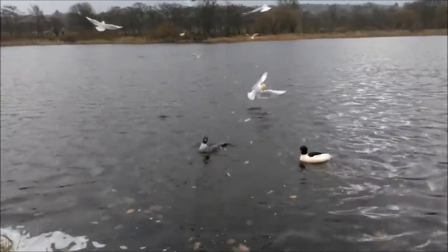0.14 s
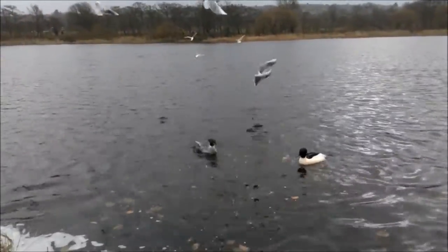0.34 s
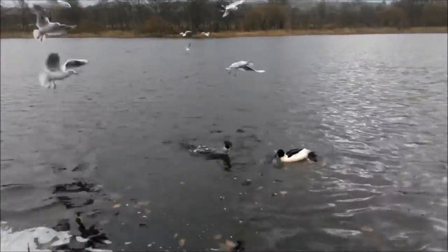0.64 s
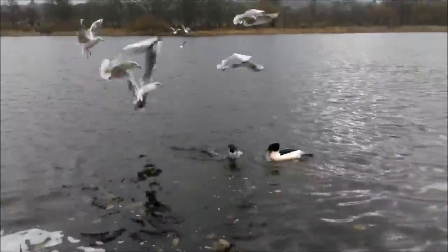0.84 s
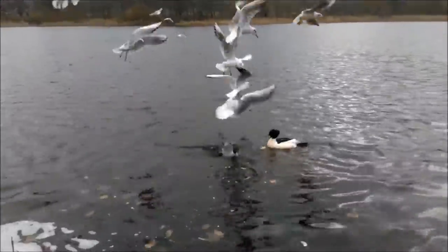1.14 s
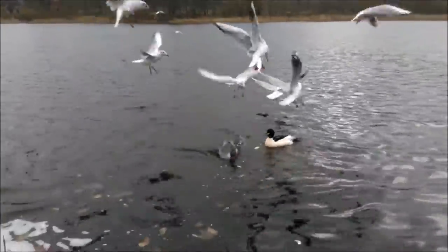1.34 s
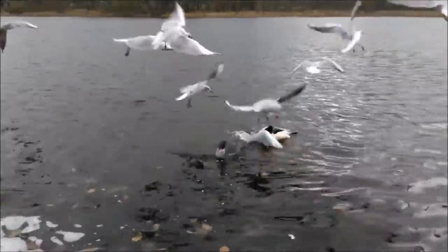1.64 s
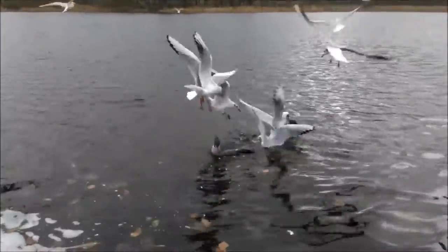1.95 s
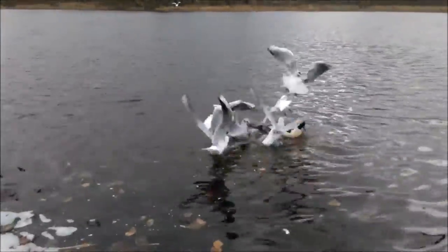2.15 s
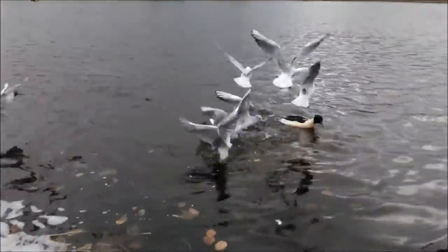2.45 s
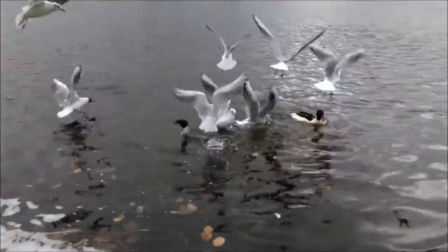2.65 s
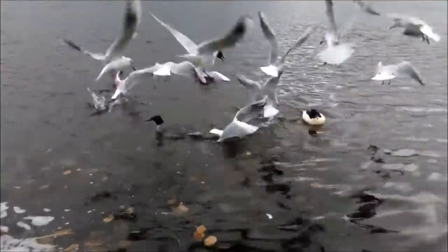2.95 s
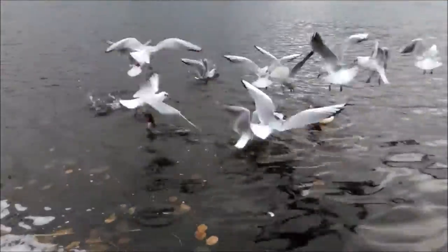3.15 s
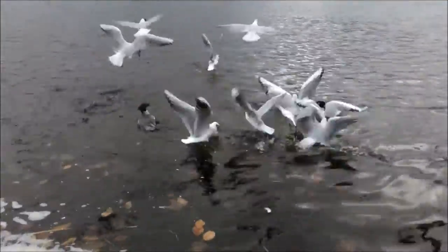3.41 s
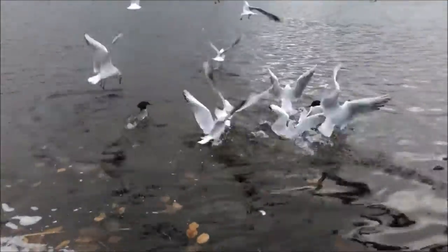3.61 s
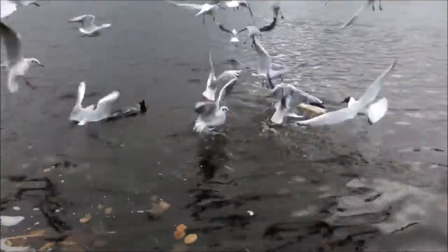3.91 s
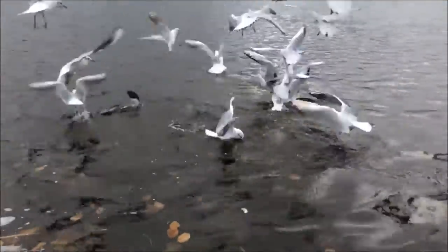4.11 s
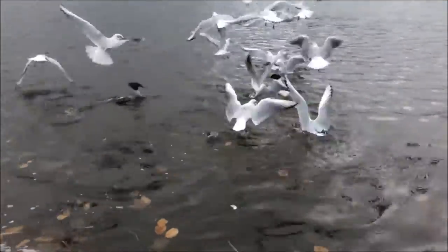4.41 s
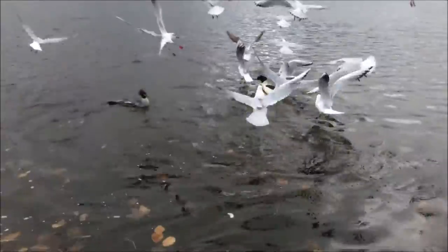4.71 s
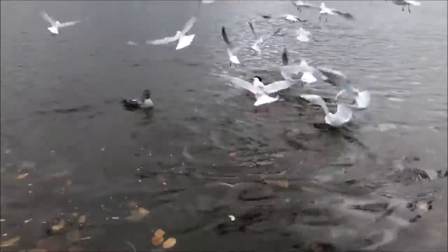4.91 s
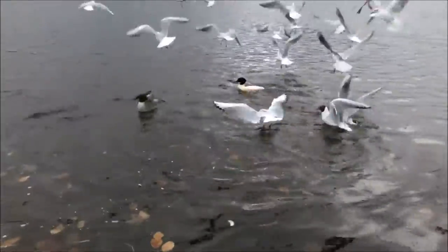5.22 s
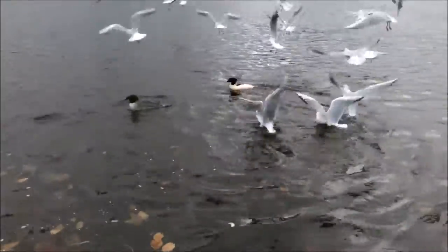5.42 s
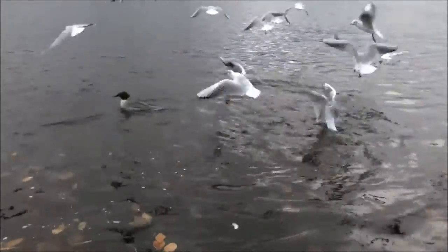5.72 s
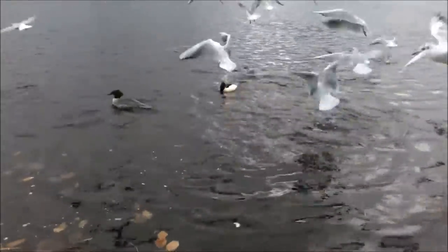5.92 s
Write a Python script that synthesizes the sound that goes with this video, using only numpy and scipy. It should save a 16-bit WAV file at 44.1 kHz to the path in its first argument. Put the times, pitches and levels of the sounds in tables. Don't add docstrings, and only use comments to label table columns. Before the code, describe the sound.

Close open-air stereo beside water, with faint distant traffic hum and hiss. In the first half second there is only soft low wind, then a cluster of small crackling splashes. From 0.7 s gulls give short, harsh, nasal cries, each a rapid rasping throb, some shrill, others dull or hoarse, with little gaps. A small wind bump comes at 1.4 s among light slaps. Around 2.0 to 2.8 s splashes sharpen, with faint bubble plops. At 3.0 s the loudest piercing shriek bursts out, doubled by a duller call. Wind then buffets the microphone in deep, uneven thumps, heaviest at 3.4 to 3.7 s, while wet slaps and fizzing spray peak. From 3.9 to 4.7 s hoarse calls crowd together, with another strong splash at 4.4 s. Afterwards shorter, weaker cries, fewer splashes and scattered gusts fade towards 6 s.

```python
import sys
import numpy as np
from scipy import signal
from scipy.fft import rfft, irfft, next_fast_len
from scipy.io import wavfile
from scipy.ndimage import uniform_filter1d

SR = 44100
rng = np.random.default_rng(int(sys.argv[2]) if len(sys.argv) > 2 else 0)


def waveform_to_disk(signal):
    frames = np.transpose(np.atleast_2d(signal))
    scaled = np.clip(frames, -1, 1) * 32767
    samples = np.round(scaled).astype(np.int16)
    wavfile.write(sys.argv[1], SR, samples)


def how_loud(loudness_db):
    steps = np.asarray(loudness_db, float) / 20
    return 10 ** steps


N = 267378
T = np.arange(N) / SR

# (loudest at [s], rise [s], fall [s], peak level [dB], pitch [Hz])
SHRILL = [
    (0.899, 0.029, 0.053, -29.5, 903),
    (1.095, 0.047, 0.022, -27.5, 1086),
    (1.848, 0.024, 0.016, -27, 1060),
    (2.984, 0.035, 0.038, -15.5, 1080),
    (3.167, 0.055, 0.022, -19.5, 1053),
    (3.229, 0.021, 0.075, -28.5, 901),
    (5.367, 0.004, 0.004, -38.5, 672),
]
PLAIN = [(0.682, 0.018, 0.013, -37.5, 833), (0.789, .004, 0.0059, -57.5, 696),
         (0.967, .004, 0.015, -32.5, 904), (1.253, 0.019, 0.032, -32, 766),
         (1.717, 0.01, 0.0071, -40.5, 750), (1.932, .016, 0.004, -43.5, 1002),
         (3.386, 0.026, 0.03, -25, 1032), (3.633, 0.015, 0.026, -26, 819), (4.57, 0.032, 0.0185, -28, 868),
         (4.934, 0.013, .004, -42, 744), (5.527, 0.0094, 0.013, -31, 868), (5.717, 0.02, 0.012, -31.5, 816),
         (6.056, 0.0045, .004, -50.5, 810)]
HOARSE = [(2.616, 0.019, 0.025, -39, 731), (2.81, 0.065, 0.018, -37.5, 1079),
          (2.882, 0.017, 0.012, -31.5, 950), (4.054, 0.025, 0.012, -37.5, 1000),
          (4.132, 0.013, 0.033, -25, 1033), (4.2, 0.03, 0.024, -24, 851), (4.25, 0.01, 0.013, -29.5, 980),
          (4.387, 0.057, 0.034, -29, 809.5), (4.835, 0.0088, 0.015, -40, 892),
          (4.996, .025, 0.052, -32, 907), (5.631, 0.024, 0.037, -52, 867), (5.755, 0.017, 0.026, -42, 822),
          (4.502, 0.017, 0.018, -42, 786), (4.70, .014, 0.015, -47, 900)]
DULL = [
    (1.154, 0.004, .026, -36, 961),
    (1.506, 0.016, 0.004, -37.5, 1025),
    (2.984, 0.036, 0.048, -22.5, 913),
    (3.469, .014, .016, -35.5, 936),
    (4.632, 0.02, 0.04, -26.5, 888),
    (5.164, .015, 0.012, -32.5, 811),
    (1.525, .004, .004, -37.5, 851),
    (3.668, .016, .02, -33.5, 903),
    (4.319, .014, .016, -38.5, 876),
]
FALLING = [
    (2.036, 0.018, 0.05, -30.5, 871),
    (2.402, 0.03, 0.03, -32, 1027),
    (3.917, .031, 0.06, -26, 1049),
    (5.556, .004, 0.048, -50, 956),
]
# (beak resonance [Hz], beak band level [dB], delay at right port [ms])
SHRILL_BEAKS = [(2900, 8, 0.35), (3200, 10.5, 0.25), (3320, 9, 0.21), (3240, 13, .1), (3360, 16.5, .04),
                (3300, 14, .06), (3430, 8.5, .05)]
PLAIN_BEAKS = [(2530, 0, 0.34), (1300, 14, 0.026), (3700, 5.5, 0.13), (3350, 2, .15), (3270, -12, 0.27),
               (3540, -1.5, 0.2), (3020, 2.5, .01), (2710, 2.5, 0.24), (2800, -1, 0.29), (3900, 4, 0.064),
               (2570, 5, 0.11), (2800, 2.5, -0.087), (2980, -13, 0.2)]
HOARSE_BEAKS = [(3740, -7, 0.22), (2480, -8, 0.19), (3560, 1, 0.12), (3080, 5, 0.11), (3470, 4.5, 0.18),
                (3220, 8.5, 0.22), (3650, 4, 0.12), (3300, 11, 0.06), (3000, -6, 0.19), (3140, 5, -0.15),
                (4020, 8, 0.097), (3030, 3, -0.0051), (3440, 13, 0.16), (3000, -5, -0.012)]
DULL_BEAKS = [(3960, 3, -0.17), (3700, 0, 0.19), (3500, 3, 0.13), (3660, -1, -0.048), (2800, -4, -0.016),
              (2620, -4, -0.091), (3640, 8, 0.037), (2980, -8, 0.14), (3000, -5, 0.17)]
FALLING_BEAKS = [(2720, 4, .1), (3300, 6.5, 0.12), (3140, 3.2, .07), (3000, -5, .04)]
# (pitch drop at start [share], at end [share], first throb [dB], last throb [dB])
SHRILL_BENDS = [(0.056, -0.0038, -10, -7.5), (.12, -.05, -15.5, -10), (0.06, 0.031, -8, -7.5),
                (.13, -0.0066, -17, -14), (0.18, 0.11, -24, -16), (0.0098, -0.016, 1.5, -13),
                (.01, .01, -3, -3)]
PLAIN_BENDS = [(0.11, .15, -7.5, -6.5), (.01, .01, -3, -3), (.01, 0.015, -3, -14),
               (-.05, -0.019, -5.5, -5.5), (.03, .03, -4, -6), (0.15, .01, 0, -3), (.15, .14, -7.5, -7),
               (.03, 0.033, -3, -6), (.13, .1, -6, -6), (-0.074, .03, -5, -3), (.03, .07, -4, -10),
               (.05, -0.034, -8.5, -7.5), (.01, .01, -3, -3)]
HOARSE_BENDS = [(.06, .07, -0.5, -1.5), (.22, 0.13, -6.5, -5), (0.025, .17, -1.5, -8),
                (0.14, 0.039, -4, -1.5), (0.11, .25, -9, -4), (-.08, 0.0986, -6, -2), (.05, 0.081, -7, -11),
                (-0.058, 0.0185, -9, -13.5), (0.12, .08, -2, -4.5), (0.12, 0.079, -10, -7),
                (.05, .08, -5, -1), (0.031, .08, 0, -6.5), (.08, 0.008, -10, 1), (.05, 0.066, 1, -10)]
DULL_BENDS = [(0.021, 0.13, -5, -8.5), (-0.018, .01, -3.5, -3), (0.065, 0.053, -17.5, -14),
              (0.015, 0.067, -3, -1.5), (.03, .05, -4, -9), (.06, 0.032, -10, -9), (.01, .01, -3, -3),
              (-0.014, 0.059, -6, -10.5), (.03, 0.014, -4.5, -3)]
FALLING_BENDS = [(-0.07, .2, -2, -25), (0.2, 0.13, -8.5, -11), (.05, 0.25, -8, -12), (.01, 0.09, -3, -5)]
# (level [dB], ...)
PIPES_DB = [
    (-4.5, -3, 1.5, 0, 6, 1, -13),
    (2, 4, -1.5, 4.5, -2.5, 2.5, 6.5, -4.5, -2.5, 3, 5, 3, -3),
    (6, 2, 0.5, -3.5, 5.5, 4.5, 5, 4.5, 5, 3, 5, 0.5, 3, 1),
    (6, 3, 7, 3.5, 6.4, 5.4, 1.5, 4.2, 3.2),
    (2.1, 4.8, 3.4, 4.5),
]
# (top band level [dB], climb of the beak band during the call [share])
VOICES = [
    (-1.5, 0.055),
    (-8.5, 0.013),
    (-7, 0.072),
    (-7.5, 0.019),
    (-7, -0.11),
]
ROUGHNESS = [
    .5,
    .48,
    .68,
    .46,
    .54,
]
# (centre [Hz], width [Hz], level [dB])
THROAT = [(4820, 4600, -0.5), (7700, 6300, -19.5), (8930, 4200, -9.5), (12700, 1400, -30)]
# (time [s], level [dB])
SPRAY = [(0.0, -101), (0.39, -70.5), (0.58, -60.5), (0.93, -67), (1.08, -59), (1.25, -61), (1.52, -69.5),
         (1.87, -62), (2.33, -55), (2.82, -51.5), (3.37, -47.5), (4.05, -49.5), (4.15, -44), (4.32, -58),
         (5.01, -54.5), (5.32, -61), (5.72, -60), (6.0, -69)]
# (frequency [Hz], level per Hz [dB])
SPRAY_COLOUR = [(300, -1), (550, 5), (1100, -3.5), (2500, 2.5), (6500, -3.5), (9400, -1), (12500, -3),
                (16000, -18)]
# (time [s], peak level [dB],
# low body level [dB])
SLAPS = [(0.448, -26.5, -49), (0.48, -31, -19), (0.51, -34, -16), (0.5643, -24, -31), (0.606, -29.5, 17),
         (1.487, -26, -27), (1.4153, -36, -34), (1.687, -31, -17), (2.1062, -25, -17), (2.173, -30, -25),
         (2.266, -36, -28), (2.311, -25.5, 0), (2.4947, -27, -4), (2.5242, -16, -16), (2.7, -35, 2),
         (2.7528, -23, -23), (3.263, -17, -25), (3.3058, -14, -4), (1.503, -29, -26), (3.477, -20, -6),
         (3.5168, -18, -28), (3.5495, -15, -12), (3.756, -19.5, -20), (3.8834, -17, 11),
         (4.3803, -14.5, -11), (4.816, -21.5, -10), (5.362, -29, -36), (5.8634, -38, -20),
         (1.786, -31.5, -18), (1.891, -28, -5), (1.951, -32, -5), (2.298, -27.5, -16), (2.3422, -25, -12),
         (2.505, -18, -17), (2.7185, -26, -24), (2.7808, -20.5, 0), (3.5983, -21, -5), (3.6198, -12.5, 8),
         (4.264, -26, -12), (4.332, -23, 4), (5.195, -35, 15), (5.783, -40, 15), (1.696, -27, -3),
         (1.523, -26.5, -23), (1.716, -30, -12), (2.642, -31, -5)]
# (time [s], peak level [dB], pitch [Hz])
PLOPS = [
    (2.255, -50, 440),
    (2.311, -42, 420),
    (2.478, -47, 754),
    (2.5, -47, 627),
    (2.64, -43.5, 594),
    (5.782, -48, 603),
]
# (frequency [Hz], level [dB])
SHADE = [(1000, 0.5), (1900, 0.4), (2700, -13), (4200, -3), (6000, -4.5), (9000, -0.1), (12500, -6),
         (16000, -14)]
# (strongest at [s], length [s], left port level [dB], right port level [dB])
GUSTS = [(0.017, 0.13, -68, -50.5), (0.222, 0.25, -49, -54.5), (0.51, 0.24, -49, -49),
         (0.819, 0.042, -45, -56), (1.374, 0.021, -33.5, -56), (1.46, 0.049, -67, -44.5),
         (2.495, 0.29, -73, -55), (2.942, 0.13, -38.5, -34.5), (3.102, 0.18, -32, -29),
         (3.186, 0.29, -42, -39.5), (3.361, 0.07, -29, -25), (3.47, 0.15, -29, -26.5),
         (3.592, 0.11, -25.5, -30.5), (3.701, 0.098, -28.5, -28), (3.9, 0.36, -51.5, -45),
         (4.114, 0.065, -29, -33), (4.226, 0.11, -55, -33.5), (4.288, 0.37, -44.5, -41),
         (4.569, 0.061, -32, -34.5), (4.683, 0.061, -34, -45), (4.874, 0.054, -27, -36),
         (4.957, 0.23, -37, -30.5), (5.088, 0.17, -38, -49), (5.402, 0.13, -44.5, -33.5),
         (5.562, 0.24, -45.5, -37.5), (5.648, 0.049, -49, -27.5), (5.755, 0.21, -53.5, -43.5),
         (5.947, 0.097, -51, -39)]
# (centre [Hz], width [Hz], pops [1/s], level [dB], extra level per gust level [dB/dB])
EDDIES = [
    (62.4, 60, 140, -2, -0.32),
    (109.5, 100.5, 200, 1, 0),
    (212.4, 204, 250, -7.5, 0.53),
    (440, 263, 580, -28, 3),
]
# (time [s], peak level [dB], pitch [Hz], port [0 left to 1 right])
THUMPS = [(1.372, -22, 148, 0.31), (2.926, -17, 176, 0), (3.042, -23, 256, 1), (3.056, -12.5, 201, 0),
          (3.4, -15.5, 177, 0), (3.426, -11.5, 188, 1), (3.482, -10, 252, 1), (3.566, -9, 190, 1),
          (3.61, -0.5, 274, 0), (3.707, -15, 220, 0), (3.707, -15.5, 205, 1), (3.729, -15, 186, 0),
          (4.116, -17, 232, 1), (4.123, -21, 181, 0.32), (4.187, -25, 149, 0.87), (4.553, -15, 158, 0),
          (4.65, -26, 170, 1), (4.749, -29, 187, 1), (4.797, -24, 233, 0), (4.777, -34, 258, 1),
          (5.56, -26.5, 295, 1), (4.853, -16.5, 203, 0), (4.872, -22, 275, 1), (4.958, -16.5, 250, 1),
          (5.011, -31, 158, 0), (5.386, -17.5, 248, 1), (5.446, -17, 142, 1), (5.92, -31, 140, 0.13),
          (4.851, -26, 520, 0), (3.607, -19, 620, 0), (3.574, -26, 715, 1), (5.641, -30, 480, 1),
          (5.385, -34, 520, 1)]
# (frequency [Hz], level per Hz [dB])
ROAD_COLOUR = [(200, -2.5), (450, -11.5), (900, -6), (1150, -12.5), (1400, -16), (2500, -25), (9500, -27.5),
               (16000, -32)]

THROB_S, THROB_SLIP_S, THROB_SCATTER_DB = 0.0135, 0.001, 1.2
PITCH_WOBBLE = 0.012
PIPE_HZ, PIPE_PER_PITCH = 1725, 0.57
GLINT_STEP_HZ, GLINT_RAD, GLINT_FROM_HZ = 250, 2.2, 1900
PLOP_T60_S, PLOP_GLIDE = 0.067, 2.1
CALM_DB, GUST_RISE, GUST_FALL = -63.5, 0.88, 0.97
ROAD_DB = -58.5
TOP_HZ = 15600


def gulls():
    kinds = zip(
        (SHRILL, PLAIN, HOARSE, DULL, FALLING),
        (SHRILL_BEAKS, PLAIN_BEAKS, HOARSE_BEAKS, DULL_BEAKS, FALLING_BEAKS),
        (SHRILL_BENDS, PLAIN_BENDS, HOARSE_BENDS, DULL_BENDS, FALLING_BENDS),
        PIPES_DB, VOICES, ROUGHNESS)
    out = np.zeros((2, N))
    for calls, beaks, bends, pipes, (top_db, climb), rough in kinds:
        for row, (beak_hz, beak_db, lag_ms), bend, pipe_db in zip(calls, beaks, bends, pipes):
            beats = throbs(*row, *bend)
            pipe_hz = PIPE_HZ + PIPE_PER_PITCH * (beats[:, 2].mean() - 850)
            s, voice = call(beats, pipe_hz, pipe_db, beak_hz, beak_db, top_db, climb, rough)
            add(out, glint(voice), s, 0.8, lag_ms)
    t = T[:8000]
    scatter = rng.standard_normal((2, len(t))) * how_loud(-60 * t / 0.1) * (t > 0.002)
    return out + how_loud(-33) * signal.fftconvolve(out, scatter, axes=1)[:, :N]


def throbs(peak_s, rise_s, fall_s, db, hz, sag_start, sag_end, first_db, last_db):
    slip, scatter, wobble = rng.standard_normal((16, 3)).T
    before, after = (int(min(round(x / THROB_S), 7)) for x in (rise_s, fall_s))
    place = np.r_[np.arange(-before, 0) / max(before, 1), np.arange(after + 1) / max(after, 1)]
    early, n = place < 0, len(place)
    s = peak_s + place * np.where(early, rise_s, fall_s)
    s = s + THROB_SLIP_S * np.clip(slip[:n], -2, 2) * (place != 0)
    size_db = db + place ** 2 * np.where(early, first_db, last_db) + THROB_SCATTER_DB * scatter[:n]
    sag = abs(place) ** 1.5 * np.where(early, sag_start, sag_end)
    pitch = hz * (1 - sag + PITCH_WOBBLE * wobble[:n])
    return np.c_[s, size_db, pitch]


def call(beats, pipe_hz, pipe_db, beak_hz, beak_db, top_db, climb, rough):
    s, db, hz = np.transpose(beats)
    t = s[0] + np.arange(-2048, 7168) / SR
    middle = (s[1:] + s[:-1]) / 2
    dip_db = np.minimum(db[1:], db[:-1]) - 22 * (1 - rough)
    knots = np.r_[s[0] - 0.017, s[0] - 0.008, s, middle, s[-1] + 0.008, s[-1] + 0.017]
    effort_db = np.r_[db[0] - 40, db[0] - 11, db, dip_db, db[-1] - 11, db[-1] - 40]
    order = np.argsort(knots)
    swell = uniform_filter1d(np.interp(t, knots[order], how_loud(effort_db[order])), size=120)
    swell[(t < knots.min()) | (t > knots.max())] = 0
    throb = np.searchsorted(middle, t)
    slide = 1 + 1.8 * np.clip(t - s[throb], -0.015, 0.015)
    pitch = uniform_filter1d(hz[throb] * slide, size=100)
    phase = 2 * np.pi * np.cumsum(pitch * (1 + 0.07 * rough * walk(250, size=len(t)))) / SR
    pulses = sum(np.cos(k * phase) for k in range(1, 17))
    pulses = pulses * how_loud(3.6 * rough * walk(600, size=len(t)))
    pulses *= 1 + 0.52 * rough * np.cos(phase / 2)
    breath = level((1 + 0.69 * np.cos(phase)) * rng.standard_normal(len(t)), 0)
    source = level(pulses, 0) + 0.75 * min(rough, 0.7) * breath
    rush = source + 0.3 * rough * breath
    shut = ring(rush, [(beak_hz * (1 - climb), 1100, how_loud(beak_db))])
    wide = ring(rush, [(beak_hz * (1 + climb), 1100, how_loud(beak_db))])
    opening = np.interp(t, [s[0] - 0.01, s[-1] + 0.01], [0, 1])
    chest = [(hz.mean(), 400, how_loud(-27))]
    pipe = [(pipe_hz, 800, -how_loud(pipe_db))]
    throat = [(f, width, -how_loud(g + top_db)) for f, width, g in THROAT]
    voice = ring(source, chest + pipe + throat) + shut + opening * (wide - shut)
    return t[0], level(voice, 0) * swell


def glint(x):
    hz = np.arange(90) * GLINT_STEP_HZ
    depth = np.clip(3 * (hz / GLINT_FROM_HZ - 1), 0.4, 1)
    turns = GLINT_RAD * rng.standard_normal((2, len(hz))) * depth
    return through(x, lambda f: np.exp(1j * np.array([np.interp(f, hz, turn) for turn in turns])))


def water():
    drops = (rng.random((2, N)) < 350 / SR) * how_loud(3.2 * rng.exponential(size=(2, N)))
    drops = uniform_filter1d(signal.lfilter([1], [1, -0.94], drops), size=40)
    drops = drops * rng.standard_normal((2, N))
    drops = through(level(drops, 0.5), lambda f: 1 / (1 + (4500 / (f + 1)) ** 4))
    fizz = level(colour(drops + rng.standard_normal((2, N)), SPRAY_COLOUR), 5.73)
    fine = through(fizz, lambda f: 1 / (1 + (6500 / (f + 1)) ** 6))
    fizz = sum(part * how_loud(1.6 * walk(12) + 2.1 * walk(45)) for part in (fine, fizz - fine))
    out = fizz * how_loud(np.interp(T, *np.transpose(SPRAY)))
    t = T[:1024]
    decay = np.exp(-(t / 0.0045) ** 3) + 0.1 * how_loud(-60 * t / 0.07)
    shape = np.minimum(t / 0.0018, 1) * decay
    for s, db, body_db in SLAPS:
        burst = rng.standard_normal(len(t)) * shape * how_loud(4 * walk(560, size=len(t)))
        slap = ring(burst, [(9180, 3350, 0.44), (4330, 9000, how_loud(body_db + 7))])
        add(out, slap * how_loud(db - 6) / abs(slap).max(), s, 2.5, 0.25)
    return out


def plops():
    out, t = np.zeros((2, N)), T[:4096]
    for s, db, hz in PLOPS:
        bubble = np.sin(2 * np.pi * hz * (t + PLOP_GLIDE * t ** 2)) * how_loud(db - 60 * t / PLOP_T60_S)
        add(out, bubble * np.minimum(t / 0.00076, 1), s, 2.5, 0.25)
    return out


def shade(ports):
    return np.array([ports[0], colour(ports[1], SHADE)])


def wind():
    out = np.zeros((2, N))
    for port, gust_db in zip(out, gusting()):
        for hz, width, rate, share_db, steep in EDDIES:
            pops = (rng.random(N) < rate / SR) * rng.standard_normal(N) * how_loud(1.83 * walk(18))
            eddy = ring(ring(pops, [(hz, 1.81 * width, 1)]), [(hz, 2.26 * width, 1)])
            port += level(eddy, share_db) * how_loud(gust_db + steep * (gust_db + 32))
    t = np.arange(-512, 1536) / SR
    for s, db, hz, port in THUMPS:
        turns = 0.31 + 1.27 * how_loud(db)
        swing = np.cos(2 * np.pi * hz * (t - 12 * t ** 2) + 1.52)
        swing *= np.exp(-(hz * t / np.where(t < 0, 0.4, turns)) ** 2)
        front = np.sin(2 * np.pi * 2.1 * hz * t) * np.exp(-(2.05 * hz * (t + 0.0021) / 0.75) ** 2)
        add(out, (swing + 0.32 * front) * how_loud(db - 20), s + t[0], 40 - 80 * round(port))
    return out


def gusting():
    power = np.full((2, N), how_loud(CALM_DB) ** 2)
    for s, length, *ports_db in GUSTS:
        side = np.where(T < s, GUST_RISE, GUST_FALL)
        shape = np.exp(-((T - s) / length / side) ** 2 * 4)
        power = power + how_loud(np.array(ports_db))[:, None] ** 2 * shape
    return 10 * np.log10(power)


def road():
    return level(colour(rng.standard_normal((2, N)), ROAD_COLOUR) * how_loud(0.8 * walk(3)), ROAD_DB)


def level(x, db):
    return x * how_loud(db) / np.sqrt(np.mean(x ** 2))


def through(x, response):
    size = next_fast_len(x.shape[-1])
    spectrum = rfft(x, size) * response(np.fft.rfftfreq(size, 1 / SR))
    return irfft(spectrum, size)[..., :x.shape[-1]]


def ring(x, modes):
    def response(f):
        return sum(g * (1j * w * f / (hz ** 2 - f ** 2 + 1j * w * f)) ** 2 for hz, w, g in modes)
    return through(x, response)


def colour(x, points):
    hz, db = np.transpose(points)
    return through(x, lambda f: how_loud(np.interp(np.log(f + 1), np.log(hz), db)))


def walk(rate, size=N):
    k = int(SR / rate)
    held = np.repeat(rng.standard_normal(size // k + 1), k)
    return 1.8 * uniform_filter1d(uniform_filter1d(held, k), k)[:size]


def add(out, x, s, pan_db, lag_ms=0):
    rows = x * np.ones((2, 1))
    for port, row, start, db in zip(out, rows, (s, s + lag_ms / 1000), (pan_db / 2, -pan_db / 2)):
        i = max(int(start * SR), 0)
        port[i:i + len(row)] += how_loud(db) * row[:N - i]


def scene():
    return shade(gulls() + water() + plops()) + wind() + road()


def top_cut(x):
    return signal.sosfilt(signal.butter(12, 15920, fs=SR, output="sos"), x)


def record(dry):
    low_pass = signal.ellip(8, 0.2, 70, TOP_HZ, fs=SR, output="sos")
    return top_cut(signal.sosfilt(low_pass, dry))


dry = scene()
out = record(dry)
waveform_to_disk(out)
```